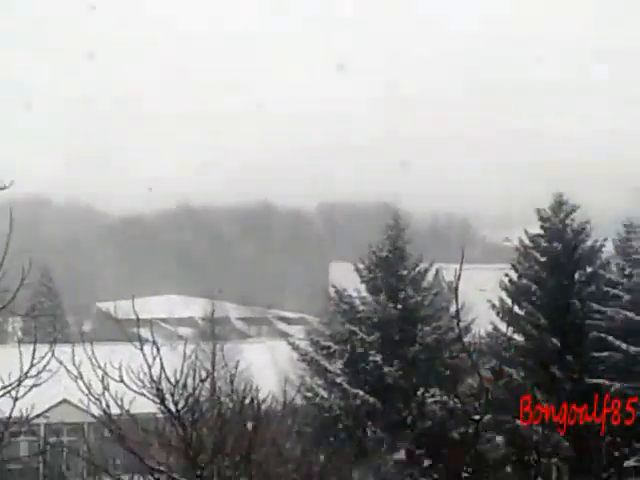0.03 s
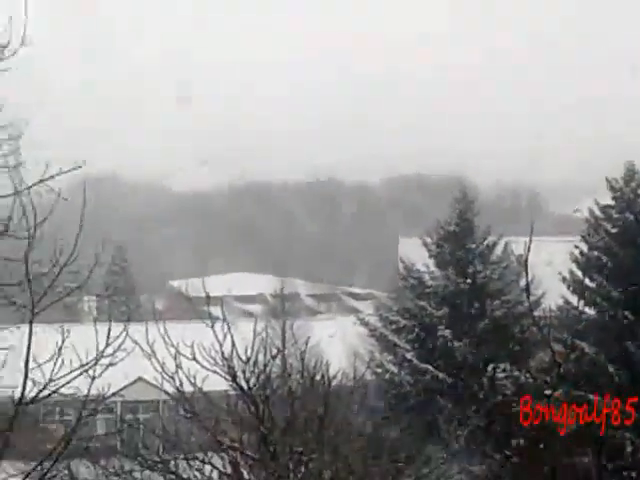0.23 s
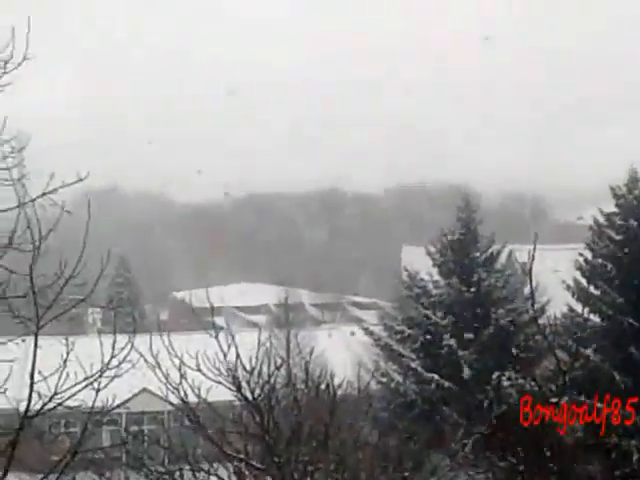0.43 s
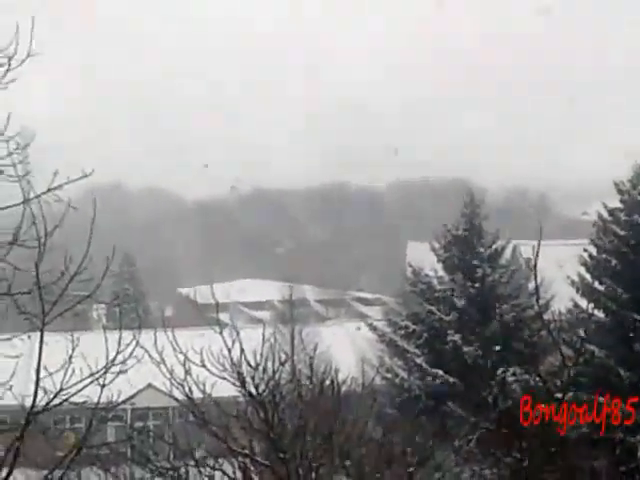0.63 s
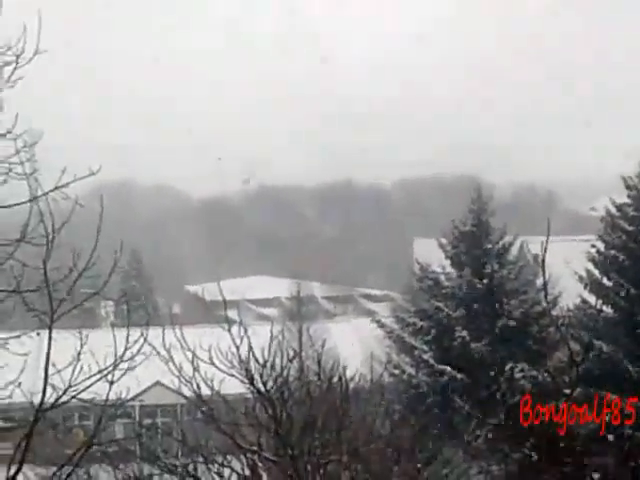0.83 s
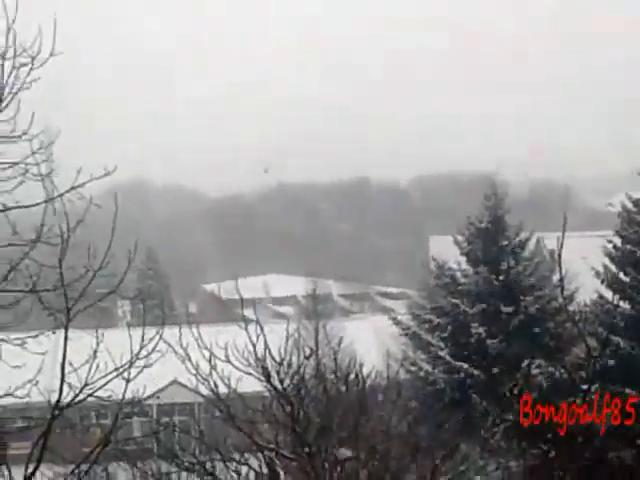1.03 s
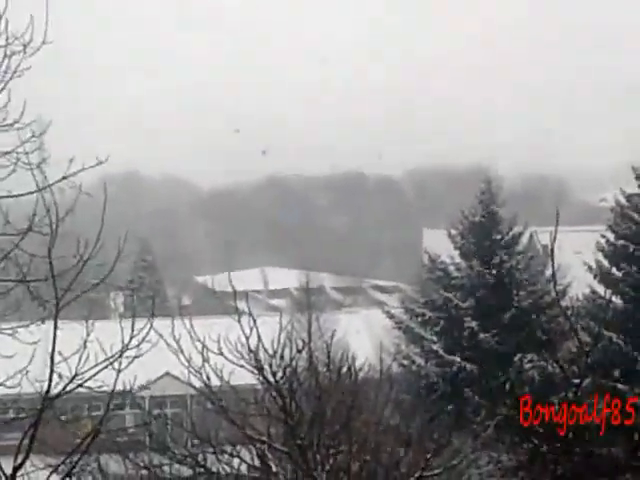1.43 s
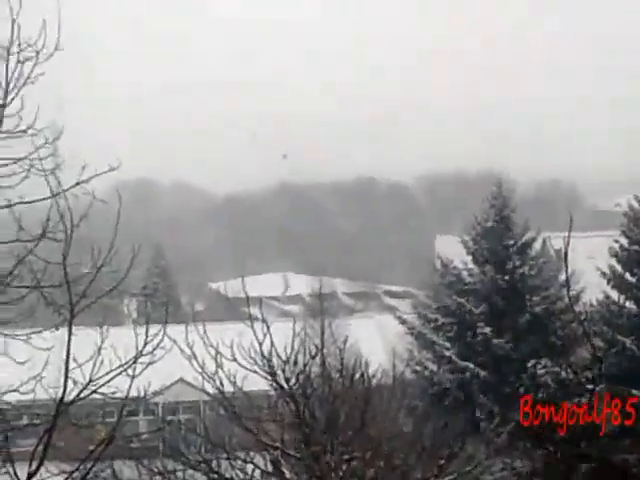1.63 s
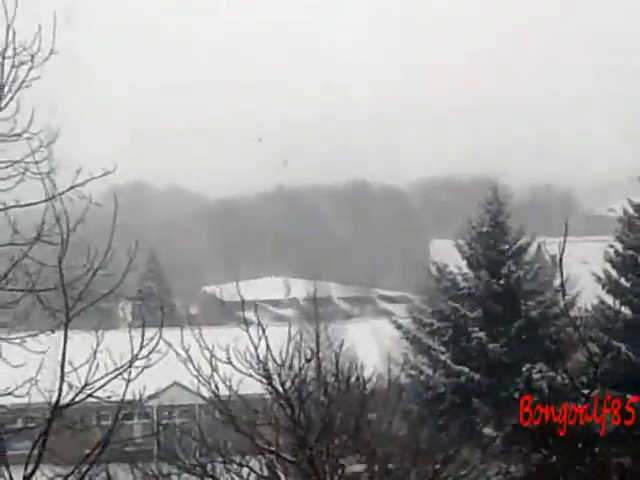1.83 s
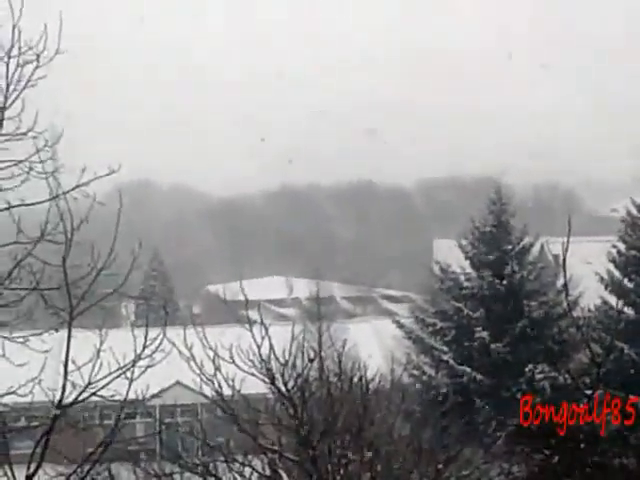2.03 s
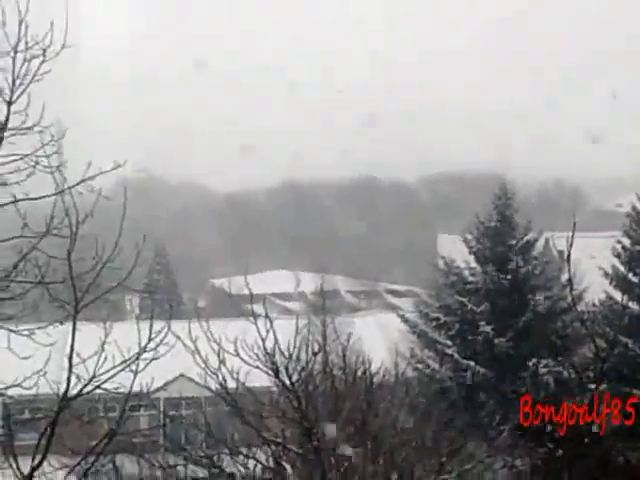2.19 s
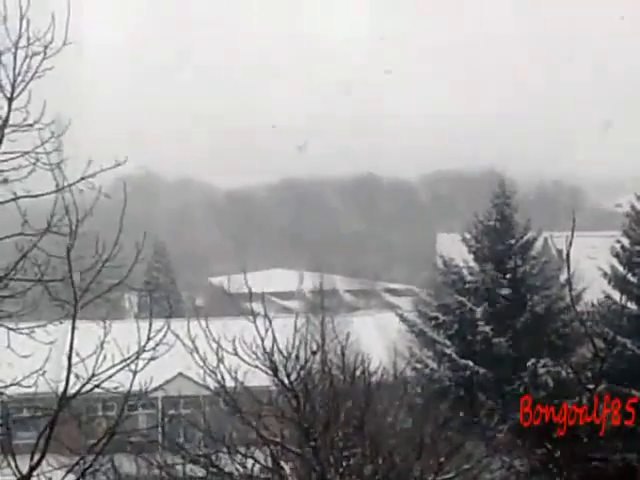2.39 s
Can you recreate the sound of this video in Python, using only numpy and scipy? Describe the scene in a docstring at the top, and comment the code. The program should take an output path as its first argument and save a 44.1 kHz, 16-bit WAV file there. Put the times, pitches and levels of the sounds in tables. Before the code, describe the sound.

Handling noise bursts close on a hand-held camera's microphone: skin slides over plastic, bumps and ticks. It quickly dies down to the quiet hiss of outdoor air, with a very faint motor hum and a few soft grip knocks.

```python
"""A loud scrape, right at the microphone: a hand slides over a small camera as it starts up.
Skin slipping on the plastic case dies away in a few shorter rubs; the grip knocks softly,
and the case creaks and ticks. The camera is hand-held outdoors, facing a quiet snowy view.
Faint air, recorder hiss and a thin motor hum remain on its one microphone."""
import sys
import numpy as np
from scipy import signal
from scipy.fft import rfft, irfft
from scipy.io import wavfile

SR = 44100
rng = np.random.default_rng(int(sys.argv[2]) if len(sys.argv) > 2 else 0)


def master_out(mix):
    """Clip the mix to full scale and print it as 16-bit PCM to the path in sys.argv[1]."""
    frames = np.transpose(np.atleast_2d(mix))
    ceiling = np.clip(frames, -1, 1)
    pcm = np.round(ceiling * 32767).astype(np.int16)
    wavfile.write(sys.argv[1], SR, pcm)


N = 112454
T = np.arange(N) / SR
HZ = np.fft.rfftfreq(N, 1 / SR)
SWITCH_ON_S = 0.2038


def amp(db):
    """Decibels to gain."""
    return 10 ** (np.asarray(db) / 20)


def unit(x):
    """Scales to rms 1."""
    return x / np.sqrt(np.mean(x ** 2) + 1e-20)


def colour(points):
    """Gain at every frequency from rows of frequency_hz, level_db."""
    hz, db = np.transpose(points)
    return amp(np.interp(np.log(HZ + 1), np.log(hz + 1), db))


def shaped(x, gain):
    """Filters by a gain for every frequency."""
    return irfft(rfft(x) * gain, N)


def noise(gain):
    """Noise of rms 1 with the given spectrum."""
    return unit(shaped(rng.standard_normal(N), gain))


def band(hz, width_hz):
    """Gain of one resonance."""
    return 1 / (1 + ((HZ - hz) / width_hz * 2) ** 2)


def drift(rate_hz):
    """Slow random wander of rms 1."""
    return noise(np.exp(-HZ / rate_hz) * (HZ > 0))


def ring(start_s, hz, t60_s):
    """One struck mode, dying by 60 dB in t60_s."""
    age = np.maximum(T - start_s, 0)
    return np.sin(2 * np.pi * hz * age) * np.exp(-np.log(1000) * age / t60_s)


def rub(start_s, hold_s, fade_db_per_s, level_db, spectrum):
    """Dense tiny slips of skin on plastic: quick attack, hold, steady fade."""
    slips_per_s, spread_db, smooth_share, attack_s = 2800, 2.5, 0.51, 0.0011
    slips = (rng.random(N) < slips_per_s / SR) * rng.choice([-1, 1], N)
    strength = amp(spread_db * np.minimum(rng.exponential(1, N), 4))
    grain = unit(shaped(slips * strength, spectrum))
    friction = np.sqrt(1 - smooth_share) * grain + np.sqrt(smooth_share) * noise(spectrum)
    attack = np.clip((T - start_s) / attack_s, 0, 1)
    return friction * attack * amp(level_db - fade_db_per_s * np.maximum(T - start_s - hold_s, 0))


def hand_slides():
    """The hand slides over the case in bright scrapes; the lighter the slide, the thinner it sounds."""
    # slides of the hand: start_s, hold_s, fade_db_per_s, level_db
    strokes = [(0.1996, 0.037, 212, -36), (0.293, 0.0087, 600, -45), (0.583, 0.0033, 520, -56),
               (0.633, 0.027, 329, -59), (0.661, 0.0064, 501.5, -51.5), (2.222, 0.024, 510.5, -61)]
    # spectrum of sliding skin: frequency_hz, level_db
    spectrum = [(100, -36), (300, -7), (700, -8), (1500, -13), (3000, -8), (5000, -4), (6000, 4),
                (6800, 10.5), (7500, -2.5)]
    light_db, lows_db_per_db, lows_below_hz = -42.5, 1.2, 5170
    lows = 1 / (1 + (HZ / lows_below_hz) ** 8)
    out = np.zeros(N)
    for start_s, hold_s, fade_db_per_s, level_db in strokes:
        weight = amp(lows_db_per_db * (level_db - light_db) * lows)
        out += rub(start_s, hold_s, fade_db_per_s, level_db, colour(spectrum) * weight)
    return out


def case_thump():
    """The case is jolted as the first slide begins."""
    return amp(-45.5) * ring(SWITCH_ON_S, hz=56, t60_s=0.067)


def outdoor_air():
    """Faint, gently swaying air and hiss over a low rumble."""
    # spectrum of the air and hiss: frequency_hz, level_db
    air_spectrum = [(20, 11.5), (35, 5), (60, -10.5), (100, -28.5), (130, -24.5), (170, -4.5), (250, -3.5),
                    (400, 2), (600, 2.5), (900, -0.5), (1400, -3), (2200, -4.5), (3500, -6), (5000, -11),
                    (6800, -11.5), (7500, -16.5)]
    # spectrum of the rumble: frequency_hz, level_db
    rumble_spectrum = [(10, 15), (18, 6.5), (30, -24), (45, -1), (80, -17.5), (200, -64)]
    air_db, sway_db, rumble_db, lowest_hz = -60, 1.05, -70.5, 9
    air = amp(air_db + sway_db * drift(rate_hz=6.7)) * noise(colour(air_spectrum))
    return air + amp(rumble_db) * noise(colour(rumble_spectrum) * (HZ > lowest_hz))


def settling_hiss():
    """A broad hiss that dies away after the scrape."""
    # spectrum of the hiss: frequency_hz, level_db
    spectrum = [(60, -35), (200, 0), (500, 1), (1200, -2.5), (2700, -1.5), (4200, -2.5), (5500, -7.5),
                (7500, -5)]
    start_db, fade_db_per_s = -45.5, 35.5
    return amp(start_db - fade_db_per_s * (T - SWITCH_ON_S)) * noise(colour(spectrum))


def wandering_hiss():
    """A faint narrow band of hiss that drifts in pitch."""
    # path of the band: time_s, centre_hz, level_db
    path = [(.3, 2800, -59.5), (.55, 2740, -62), (.7, 2740, -66.5), (.8, 3150, -76), (1.15, 3270, -76.5),
            (1.45, 3700, -83), (1.95, 4500, -77.5), (2.15, 4100, -72.5), (2.55, 3950, -79)]
    time_s, centre_hz, level_db = np.transpose(path)
    narrow = band(0, width_hz=450)
    fuzz = noise(narrow) + 1j * noise(narrow)
    phase = 2 * np.pi * np.cumsum(np.interp(T, time_s, centre_hz)) / SR
    return amp(np.interp(T, time_s, level_db)) * (fuzz * np.exp(1j * phase)).real


def motor():
    """A small motor wavers in speed: thin harmonics and a low fuzzy hum."""
    # harmonics of the motor: multiple, level_db
    harmonics = [(1, -95), (3, -81.5), (5, -77), (6, -79), (7, -84), (8, -81.5)]
    pitch_hz, waver = 186.5, 0.0014
    turn = 2 * np.pi * np.cumsum(pitch_hz * (1 + waver * drift(rate_hz=16))) / SR
    whine = sum(amp(level_db) * np.sqrt(2) * np.sin(multiple * turn + 2 * np.pi * rng.random())
                for multiple, level_db in harmonics)
    hum = amp(-78) * noise(band(hz=325.6, width_hz=16))
    return whine + hum


def grip_knocks():
    """Each knock of the grip is one short push with a faint ring of the case."""
    # knocks of the grip: time_s, level_db, width_ms
    knocks = [(0.2962, -26, 0.16), (.410, -36, 0.24), (.649, -37.5, 0.33), (1.374, -50.5, .7),
              (1.472, -43.5, 0.2), (1.643, -48, 0.6), (1.693, -37.5, 0.12), (2.121, -46.5, 0.51),
              (2.202, -44.5, 0.33), (2.240, -35.5, 0.21), (2.245, -42, 0.29)]
    # modes of the case: pitch_hz, relative_db, t60_s
    modes = [(350, -32, 0.1), (520, -60, 0.033), (724, -23, 0.038)]
    out = np.zeros(N)
    for time_s, level_db, width_ms in knocks:
        push = np.exp(-0.5 * ((T - time_s) * 1000 / width_ms) ** 2)
        ringing = sum(amp(relative_db) * ring(time_s, hz, t60_s) for hz, relative_db, t60_s in modes)
        out += amp(level_db) * (push + ringing)
    low_cut = signal.butter(2, 167, "high", fs=SR)
    return signal.lfilter(*low_cut, signal.lfilter(*low_cut, out))


def grip_scuffs():
    """The grip catches on the case in short, duller rubs."""
    # scuffs of the grip: start_s, hold_s, fade_db_per_s, level_db
    scuffs = [(.319, 0.001, 1500, -32.5), (0.328, 0.015, 218, -42.5), (0.409, .004, 336, -48)]
    # spectrum of catching skin: frequency_hz, level_db
    spectrum = [(200, -16), (1000, -13.5), (1800, -2), (2600, -2.5), (3600, -2), (5200, 0), (6200, -2.5),
                (7500, -10)]
    return sum(rub(*scuff, colour(spectrum)) for scuff in scuffs)


def case_creak():
    """The case creaks once, a short tone roughened by fast wavering of its pitch."""
    span_s, pitch_hz, level_db, waver = (0.410, 0.440), 530, -50, 0.057
    arch = np.sqrt(abs(np.sin(np.pi * np.interp(T, span_s, [0, 1]))))
    phase = 2 * np.pi * np.cumsum(pitch_hz * (1 + waver * drift(rate_hz=150))) / SR
    return amp(level_db) * arch * np.sin(phase)


def case_ticks():
    """Tiny bright snaps of the case, each a high mode that dies at once."""
    # ticks of the case: start_s, level_db
    ticks = [(.5885, -42), (.6785, -41)]
    return sum(amp(level_db) * ring(start_s, hz=6000, t60_s=0.0016) for start_s, level_db in ticks)


def scene():
    """Close handling noise over a faint background, all at the camera's one microphone."""
    handling = hand_slides() + case_thump() + grip_knocks() + grip_scuffs() + case_creak() + case_ticks()
    background = outdoor_air() + settling_hiss() + wandering_hiss() + motor()
    return (handling + background)[None]


def record(dry):
    """The recorder switches on, keeps a narrow band, and mirrors its treble about half its clock."""
    # response to the mirrored treble: frequency_hz, gain_db
    mirror_response = [(8600, -2), (9200, -5), (10000, -9), (11000, -12.5), (12000, -19), (12900, -24.5)]
    top_hz, edge_hz, clock_hz, cutoff_hz = 7280, 122, 16000, 12866
    in_band = shaped(dry[0], 0.5 - 0.5 * np.tanh((HZ - top_hz) / (2 * edge_hz)))
    mirrored = (np.conj(signal.hilbert(in_band)) * np.exp(2j * np.pi * clock_hz * T)).real
    offset = 0.0022 * np.clip((T - SWITCH_ON_S) / 0.022, 0, 1)  # the converter settles just off zero
    switched = (in_band + shaped(mirrored, colour(mirror_response)) + offset) * (T >= SWITCH_ON_S)
    high_cut = signal.firwin(511, cutoff_hz, window=("kaiser", 9), fs=SR)
    return signal.oaconvolve(switched, high_cut, "same")[None]


dry = scene()
out = record(dry)
master_out(out)
```